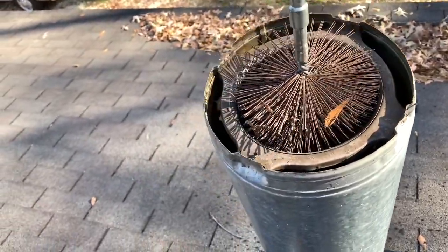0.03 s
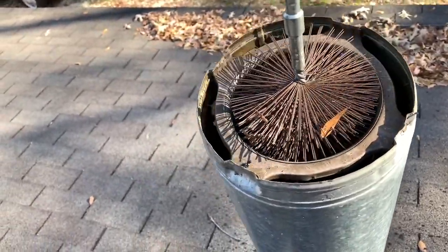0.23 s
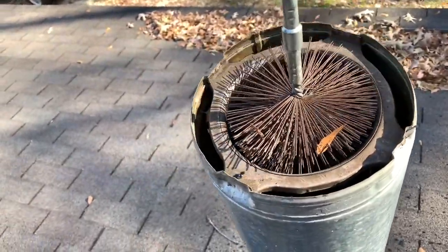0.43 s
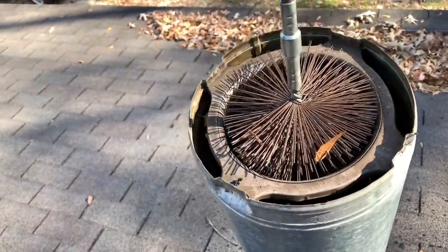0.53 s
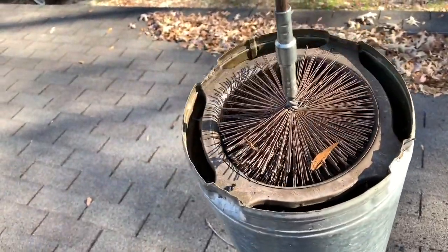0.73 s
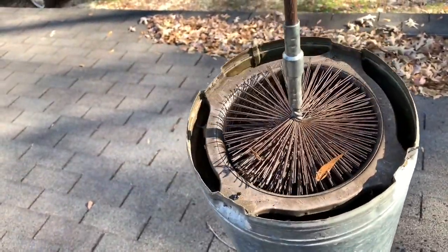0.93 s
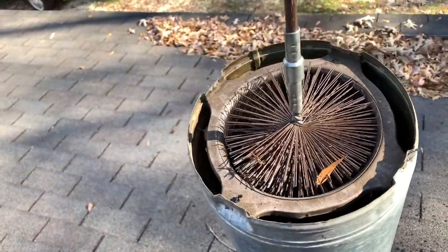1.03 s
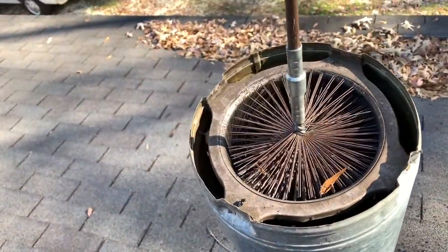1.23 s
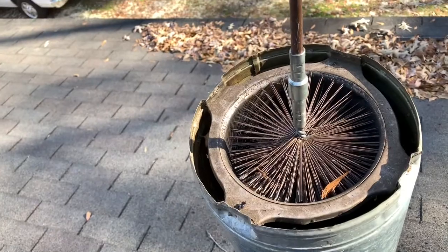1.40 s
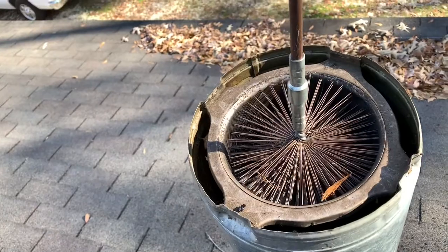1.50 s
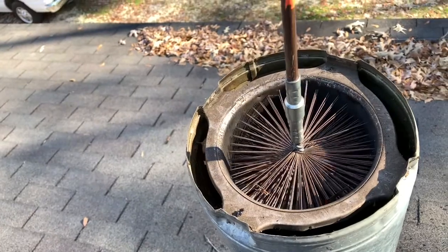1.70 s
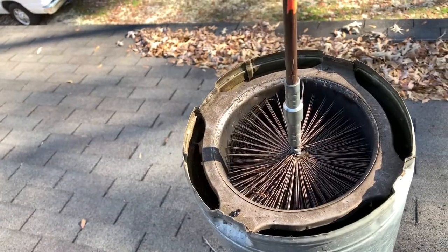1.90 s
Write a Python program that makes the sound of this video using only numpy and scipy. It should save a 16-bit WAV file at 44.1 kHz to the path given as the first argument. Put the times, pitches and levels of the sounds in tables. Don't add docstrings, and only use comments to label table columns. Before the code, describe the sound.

A wire brush is worked down a metal flue in short uneven jerks: bright, gritty hissing scrapes with bristle ticks and a hollow pipe ring around 1.4 kilohertz. Scrapes come at 0.05, 0.3 and 0.6 seconds; a thin clink at 0.52, a dull knock at 0.77. Stronger rasps follow near 1.05, 1.35 and loudest at 1.6-1.77, then fade. Low wind puffs bump the close microphone over faint outdoor air.

```python
import sys
import numpy as np
from scipy import signal
from scipy.fft import rfft, irfft, next_fast_len
from scipy.io import wavfile
from scipy.ndimage import uniform_filter1d, map_coordinates

SR = 44100
rng = np.random.default_rng(int(sys.argv[2]) if len(sys.argv) > 2 else 0)


def linear_from_db(decibels):
    return 10 ** (np.asarray(decibels, float) / 20)


def output_pcm(signal):
    pcm = np.clip(np.atleast_2d(signal).T, -1, 1) * 32767
    wavfile.write(sys.argv[1], SR, np.round(pcm).astype(np.int16))


N = 85995

# (frequency [Hz], share [0-1])
RIM_LIKENESS = [(3800, 1), (4400, .3), (5200, .15), (6000, 1)]
TREBLE_HZ, LAG_EASES_HZ = 8400, 15000


def unit(x):
    return x / np.sqrt(np.mean(x ** 2) + 1e-20)


def along(points, hz):
    f, v = np.transpose(points)
    return np.interp(np.log(hz + 1), np.log(f + 1), v)


def wobble(rate_hz):
    return map_coordinates(rng.standard_normal(400), [np.arange(N) * rate_hz / SR])


def filtered(x, response):
    m = next_fast_len(N + SR // 2)
    return irfft(rfft(x, m) * response(np.fft.rfftfreq(m, 1 / SR)), m)[..., :N]


def even_power(colour):
    rms = np.sqrt(np.mean(np.abs(colour(np.fft.rfftfreq(N, 1 / SR))) ** 2))
    return lambda hz: colour(hz) / rms


def decays(kicks, tau_s):
    return signal.lfilter([1], [1, -np.exp(-1 / (tau_s * SR))], kicks)


def ports(pair, likeness_kept):
    # (frequency [Hz], correlation [-1 to 1])
    alike = [(300, .9), (700, .55), (1400, .93), (2300, -.35), (3300, .58), (4300, .4), (5300, .7),
             (6800, .35)]
    # (frequency [Hz], lead [rad])
    phase_lead = [(1800, 0), (4000, -.2), (4600, -2.8), (5750, -3.3), (6000, -6.1), (6500, -6.7),
                  (7500, -9.3), (8550, -9.42)]
    port_lag_s, lag_left = .000308, .7

    def response(hz):
        treble_alike = .88 / (1 + (TREBLE_HZ / (hz + 1)) ** 16) - (hz < 3000)
        likeness = np.maximum(along(alike, hz) * along(likeness_kept, hz), treble_alike)
        u = np.arccos(np.clip(likeness, -1, 1)) / 2
        lagging_hz = np.maximum(hz - phase_lead[-1][0], 0)
        lagging_hz = lagging_hz - (1 - lag_left) * np.maximum(hz - LAG_EASES_HZ, 0)
        lead = along(phase_lead, hz) + 2 * np.pi * port_lag_s * lagging_hz
        mix = np.array([[np.cos(u), np.sin(u)], [np.cos(u), -np.sin(u)]])
        return mix * np.exp([[-.5j * lead], [.5j * lead]])

    return filtered(pair[None], response).sum(axis=1)


def outdoors():
    # (frequency [Hz], level [dB per Hz])
    air = [(30, -45), (100, -8), (155, 6.5), (230, -5.5), (1000, -12.5), (3000, -10.5), (8000, -17),
           (16000, -16)]
    murmur = filtered(rng.standard_normal((2, N)), lambda hz: linear_from_db(along(air, hz)))
    return linear_from_db(-44.5) * ports(unit(murmur), RIM_LIKENESS)


def wind():
    # (frequency [Hz], level [dB per Hz])
    push = [(20, -19), (35, -11), (50, 10), (110, 2), (200, -11), (400, -43)]
    # (frequency [Hz], level [dB per Hz])
    flap = [(60, -15), (130, 4), (200, 1), (350, -7.5), (700, -21), (1500, -73)]
    # (time [s], half width [s], low push [dB], flapping [dB])
    puffs = [(.07, 0.033, -42, -52), (.14, 0.047, -39.5, -47), (.25, 0.023, -30.5, -39.5),
             (.34, 0.061, -38.5, -42.5), (0.417, 0.025, -34, -37.5), (0.503, 0.026, -29.5, -38.5),
             (0.546, 0.0081, -26.5, -27), (0.584, 0.02, -27, -27.5), (.62, 0.027, -34.5, -37),
             (0.699, 0.01, -31, -45), (0.821, 0.079, -36.5, -44.5), (.96, 0.026, -42, -46),
             (1.07, 0.057, -42, -42.5), (1.182, 0.043, -32.5, -39), (1.211, .008, -52, -33.5),
             (1.228, .006, -35, -44), (1.259, 0.012, -49, -30), (1.275, 0.013, -32.5, -47),
             (1.294, 0.0073, -40, -31.5), (1.31, 0.0066, -39, -59), (1.37, 0.052, -45, -41.5),
             (1.475, 0.028, -32, -46.5), (1.53, 0.034, -41, -48), (1.61, 0.041, -33.5, -47.5),
             (1.78, 0.042, -48, -45), (1.95, 0.01, -36, -44)]
    breeze_db, side_db, lump_db = -54.5, -15, 1.4
    even = int(0.025 * SR)
    t = np.arange(N) / SR
    s, width, push_db, flap_db = np.transpose(puffs)[..., None]
    bells = np.exp(-((t - s) / width) ** 2)
    out = 0
    for colour, db in [(push, push_db), (flap, flap_db)]:
        mid, side = filtered(rng.standard_normal((2, N)), lambda hz: linear_from_db(along(colour, hz)))
        power = uniform_filter1d(uniform_filter1d(mid ** 2, even), even)
        mid = mid / np.sqrt(np.abs(power))
        gain = np.sqrt((linear_from_db(2 * db) * bells).sum(axis=0) + linear_from_db(2 * breeze_db))
        gain = gain * linear_from_db(lump_db * wobble(40.15))
        out = out + gain * (unit(mid) + linear_from_db(side_db) * unit(side) * np.array([[1], [-1]]))
    return out


def knocks(hits, modes):
    rattle_db, rattle_s, rise_s = -16, 0.0067, 0.00021
    out, t = np.zeros((2, N + SR)), np.arange(SR // 8) / SR
    for s, db in hits:
        chances = rng.normal(size=(len(modes), 2, 2, 1))
        for (level, turn), (hz, mode_db, t60) in zip(chances, modes):
            chatter = linear_from_db(rattle_db) * np.exp(-t / rattle_s) * rng.standard_normal(len(t))
            ring = linear_from_db(-60 * t / min(t60, .05)) * np.sin(2 * np.pi * hz * t + 0.58 * turn)
            ring = ring * (1 - np.exp(-t / rise_s))
            rattle = signal.fftconvolve(ring, chatter[None], axes=1)[:, :len(t)]
            rattle = rattle / np.sqrt(rattle_s * SR)
            out[:, round(s * SR):][:, :len(t)] += linear_from_db(db + mode_db + 2 * level) * (ring + rattle)
    return out[:, :N]


def rod_clink():
    # (time [s], level [dB])
    hits = [
        (.5165, -31),
        (.519, -35.5),
        (.5215, -33),
        (.526, -32),
        (.53, -39),
    ]
    # (frequency [Hz], level [dB], time to fall 60 dB [s], held to .05 at most)
    modes = [(2506, -6.5, 0.17), (3625, -4.5, 0.058), (3930, 1, 0.036), (4900, -4, 0.024),
             (5400, -2, 0.018)]
    return knocks(hits, modes)


def rod_thud():
    # (time [s], level [dB])
    hits = [
        (.7635, -27.5),
        (.768, -22),
        (.773, -27),
    ]
    # (frequency [Hz], level [dB], time to fall 60 dB [s])
    modes = [(800, -4, 0.025), (945, -3, 0.0098), (610, -21, 0.0088), (1197, 3, 0.015), (1270, -6.5, 0.035),
             (1500, -4, 0.026), (1580, -5, 0.018), (504, -21, 0.045)]
    return knocks(hits, modes)


def effort():
    # (start [s], length [s], first level [dB], last level [dB], wall over bristles [dB])
    strokes = [(0.03, 0.16, -41.5, -31, 5.5), (0.263, 0.11, -29.5, -25.5, 4),
               (0.384, 0.06, -58, -41.5, 8.5), (0.565, 0.12, -34.5, -32.5, 1.5),
               (0.69, 0.21, -39.5, -41, 0), (0.757, 0.022, -36, -45, 7.5), (0.783, 0.097, -29.5, -29.5, -1),
               (0.923, 0.18, -35, -28, 1), (1.046, 0.15, -25, -25, -1.5), (1.217, 0.062, -40, -46.5, -3.5),
               (1.317, 0.092, -29, -23, -1), (1.413, 0.072, -40, -48, 2), (1.485, 0.07, -36.5, -24.5, 1.5),
               (1.602, 0.032, -36.5, -24.5, -1.5), (1.619, 0.15, -21, -22.5, 0.5)]
    attack_s, release_s, arch_db = 0.0067, 0.016, 4
    flue_builds_db = 4.5
    t = np.arange(N) / SR
    creep = linear_from_db(2.192 * (-43 + 1.5 * wobble(25))) * np.clip(t / .06, .02, 1) ** 2
    tips, wall = creep.copy(), creep * linear_from_db(2 * 7)
    build = wall.copy()
    for s, length, first_db, last_db, wall_db in strokes:
        u = np.clip((t - s) / length, 0, 1)
        edge = np.clip((t - s) / attack_s, 0, 1) * np.exp(-np.maximum(t - s - length, 0) / release_s)
        level_db = first_db + (last_db - first_db) * u + arch_db * np.sin(np.pi * u)
        power = (edge * linear_from_db(level_db)) ** 2
        tips = tips + power
        wall = wall + power * linear_from_db(2 * wall_db)
        build = build + power * linear_from_db(2 * (wall_db + flue_builds_db * (u - .5)))
    shake = linear_from_db(1 * wobble(59.88) + 1 * wobble(18))
    return np.sqrt(tips) * shake, np.sqrt(wall) * shake, np.sqrt(build) * linear_from_db(2 * wobble(12.28))


def snap_grain():
    snaps_per_s, spread_db, snap_s = 700, 2.5, 0.00078
    chance = rng.random(N)
    size = np.minimum(rng.exponential(size=N), 2)
    snaps = unit(decays((chance < snaps_per_s / SR) * linear_from_db(spread_db * size), snap_s))
    share = np.array([[0.22], [0.11]])
    return np.sqrt(1 - share + share * snaps ** 2)


def lone_bristles():
    # (time [s], peak level [dB])
    ticks = [(0.2668, -17), (0.3087, -11), (0.5172, -26), (0.757, -19.5), (0.7654, -40), (0.8023, -10.5),
             (0.874, -21), (0.976, -23), (1.0004, -12.5), (1.039, -9.5), (1.4857, -16.5), (1.704, -8),
             (1.734, -16), (1.743, -5), (1.8412, -23), (1.875, -20.5), (1.9214, -31), (1.9315, -25.5),
             (1.9464, -37)]
    # (time [s], level [dB])
    snags = [(0.0254, -30), (0.0416, -30.0), (0.0818, -25), (0.0935, -17), (0.109, -17), (0.1721, -32),
             (0.2894, -8.5), (0.3103, -10), (0.3605, -13), (0.3756, -14), (0.4442, -27), (0.5166, -34),
             (0.523, -29), (0.5726, -38), (0.641, -17), (0.6482, -17), (0.6674, -19), (0.671, -23),
             (0.7157, -21), (0.854, -19.5), (0.8756, -19), (0.9254, -20), (0.9523, -15.5), (0.9793, -14),
             (0.9843, -23), (1.0255, -19.0), (1.041, -7), (1.0758, -7), (1.133, -6), (1.146, -10),
             (1.1786, -28), (1.1982, -22), (1.2311, -18.5), (1.2697, -30), (1.2768, -33.5), (1.3275, -19.0),
             (1.3513, -11.5), (1.3655, -12.0), (1.4046, -26), (1.4382, -37), (1.4947, -16), (1.501, -16),
             (1.5122, -10.5), (1.54, -15.5), (1.5887, -17), (1.6004, -18), (1.6284, -12.0), (1.7176, -8),
             (1.884, -33.0), (1.9125, -28.5), (1.9315, -39), (1.9487, -31)]
    lone = np.zeros(N)
    for s, db in ticks:
        lone[round(s * SR)] = linear_from_db(db - 7.5)
    lone = decays(lone, 0.0057) + linear_from_db(-2) * decays(lone, .0007)
    snag_s, snag_db = np.transpose(snags)
    kicks = np.bincount(np.round(snag_s * SR).astype(int), linear_from_db(snag_db - 2.5), N)
    slip = decays(kicks, 0.0017) - decays(kicks, 0.00082)
    return np.hypot(lone, 2 * np.abs(slip))


def streaky(pair):
    z = signal.stft(pair, nperseg=1024, noverlap=768)[2]
    field = uniform_filter1d(rng.standard_normal(z.shape[1:]), size=4, axis=0)
    field = uniform_filter1d(field, size=8, axis=1)
    streaks_db = 3 * unit(field)
    return unit(signal.istft(z * linear_from_db(streaks_db), nperseg=1024, noverlap=768)[1][:, :N])


def flue_resonance(column):
    # (frequency [Hz], width [Hz], level at the rim [dB], level sunk [dB])
    modes = [(1410, 70, -25, 2.5), (1415, 24, 0, -10), (1495, 11, 2, 0.5), (1533, 35, 0, 0),
             (1576, 8.5, 1.5, -2), (1610, 22, -5, -5), (1295, 41, -40, -14.5)]

    def response(f):
        total = 0
        for mode in modes:
            hz, width_hz = mode[:2]
            total = total + linear_from_db(mode[column]) * 1j * f * width_hz / (hz ** 2 - f * f + 1j * f * width_hz)
        return total

    return even_power(response)


def flue_notes():
    # (time [s], half width [s], frequency [Hz], level [dB])
    swells = [(.18, 0.051, 1448, -43.5), (.32, 0.048, 1438, -43), (.35, 0.036, 1550, -39),
              (.48, 0.11, 1490, -51.5), (.665, 0.038, 1430, -43.5), (.66, 0.13, 1580, -63),
              (.83, 0.022, 1480, -37), (.88, 0.076, 1415, -43), (1.05, 0.013, 1590, -36),
              (1.07, 0.023, 1430, -38), (1.2, 0.036, 1403, -41.5), (1.39, 0.038, 1385, -41),
              (1.585, 0.024, 1410, -34), (1.69, 0.024, 1410, -33), (1.71, 0.021, 1495, -48),
              (1.769, 0.031, 1415, -31.5)]
    sway_db, sway_hz, wander_rad = 1.2, 35, .6
    t = np.arange(N) / SR
    out = 0
    for s, width, hz, db in swells:
        swell = linear_from_db(db + 4 + sway_db * wobble(sway_hz)) * np.exp(-((t - s) / width) ** 2)
        out = out + swell * np.sin(2 * np.pi * hz * t + wander_rad * wobble(sway_hz))
    return out


def brush():
    # (time [s], depth [0-1])
    sinking = [
        (.45, 0),
        (.62, 1),
    ]
    # (frequency [Hz], level [dB per Hz])
    bristle_colour = [(5000, -57), (7500, -10), (8500, -4), (9800, 2.5), (11500, -0.5), (13500, -2.5),
                      (15000, -9), (16000, -11)]
    # (frequency [Hz], level [dB per Hz])
    wall_colour = [(200, -20.5), (500, -7), (1100, -13), (2000, -7.5), (2600, 0), (4200, -3.5),
                   (5600, -3.5), (8000, -2.5)]
    wall_db, wall_top_hz, flue_db = -7.5, 9100, -11.5
    scatter_loss_db = -2.5
    tips, wall, build = effort()
    tip_grain, wall_grain = snap_grain()
    lone = lone_bristles()
    deep = np.interp(np.arange(N) / SR, *np.transpose(sinking))
    bright = even_power(lambda hz: linear_from_db(along(bristle_colour, hz)))
    dull = even_power(lambda hz: linear_from_db(along(wall_colour, hz)) / (1 + (hz / wall_top_hz) ** 12))

    tip_noise, wall_noise, rim_noise, sunk_noise = rng.standard_normal((4, 2, N))
    hiss = filtered(tip_noise * np.hypot(tips * tip_grain, lone), bright)
    drive = np.hypot(wall * wall_grain, 0.42 * lone) * linear_from_db(np.outer([0, scatter_loss_db], deep))
    wall_sound = filtered(streaky(wall_noise) * drive, dull)
    ring = filtered(rim_noise * build * np.sqrt(1 - deep), flue_resonance(2))
    ring = ring + filtered(streaky(sunk_noise) * build * np.sqrt(deep), flue_resonance(3))
    sound = hiss + linear_from_db(wall_db) * wall_sound + linear_from_db(flue_db) * ring
    return ports(sound * (1 - deep), RIM_LIKENESS) + ports(sound * deep, [(1, 1)]) + flue_notes()


def flue_echo(x):
    t60_s, top_hz = 0.28, 5100
    t = np.arange(SR // 3) / SR
    tail = rng.standard_normal(len(t)) * linear_from_db(-60 * t / t60_s)
    wet = signal.fftconvolve(x, tail[None] / np.linalg.norm(tail), axes=1)[:, :N]
    return filtered(wet, lambda hz: 1 / (1 + 1j * hz / top_hz) ** 2)


def scene():
    metal = rod_clink() + rod_thud() + brush()
    return outdoors() + wind() + metal + linear_from_db(-12) * flue_echo(metal)


def wind_filter(hz, t):
    # (time [s], frequency [Hz])
    mono_below = [
        (1.1, 23),
        (1.28, 220),
        (1.5, 209),
        (1.58, 270),
        (1.68, 191),
        (1.95, 170),
    ]
    # (time [s], frequency [Hz])
    sweep = [
        (1.13, 120),
        (1.27, 252),
        (1.42, 312),
    ]
    corner_hz = np.interp(t, *np.transpose(mono_below))
    sweep_hz = np.interp(t, *np.transpose(sweep), left=-999, right=-999)
    ringing = 1 + linear_from_db(8) * np.exp(-((hz - sweep_hz) / 20) ** 2)
    return ringing / (1 + (corner_hz / (hz + 1)) ** 16)


def weak_parts(z, hz):
    # (frequency [Hz], threshold shift [dB])
    thrift = [(3000, 1), (7800, 1), (9000, -2), (11000, -2), (11500, 0), (12800, 0), (13100, 2.2),
              (14000, 2.5)]
    weak_db, sway_db, busy_share = -9.5, 2.6, .7
    bands = (np.abs(z[:, :1020]) ** 2).reshape(2, 85, 12, -1).sum(axis=2)
    bands = uniform_filter1d(bands, size=4, axis=2)
    band_hz = hz[:1020:12]
    sway = uniform_filter1d(rng.standard_normal(bands.shape), size=8, axis=2)
    sway = unit(uniform_filter1d(sway, size=2, axis=1))
    busy = np.log(bands.sum(axis=(0, 1)) + 1e-12)
    sway = sway + busy_share * unit(busy - busy.mean()) * (band_hz < TREBLE_HZ)
    steadier = 1 + 2 * (band_hz > TREBLE_HZ) * (band_hz < LAG_EASES_HZ)
    limit_db = weak_db + along(thrift, band_hz) + sway_db * sway / steadier
    weak = bands < linear_from_db(2 * limit_db) * bands[::-1]
    weak = np.pad(np.repeat(weak, 12, axis=1), ((0, 0), (0, 5), (0, 0)))
    return weak & (hz > 2800)


def band_limit(x):
    return signal.sosfilt(signal.butter(12, 15800, fs=SR, output="sos"), x)


def record(dry):
    frames = dict(nperseg=2048, noverlap=1536)
    mid_side = np.array([dry[0] + dry[1], dry[0] - dry[1]]) / 2
    hz, t, z = signal.stft(mid_side, SR, **frames)
    hz = hz[:, None]
    side_gain = wind_filter(hz, t)
    kept = z * np.where(weak_parts(z, hz), 0, 1)
    kept = kept * np.array([np.ones_like(side_gain), side_gain]) * (hz < 15790)
    mid, side = signal.istft(kept, SR, **frames)[1][:, :N]
    return band_limit(np.array([mid + side, mid - side]))


dry = scene()
out = record(dry)
output_pcm(out)
```